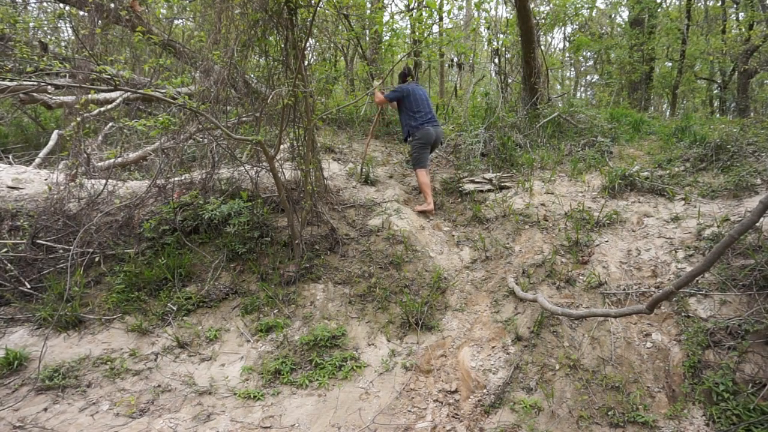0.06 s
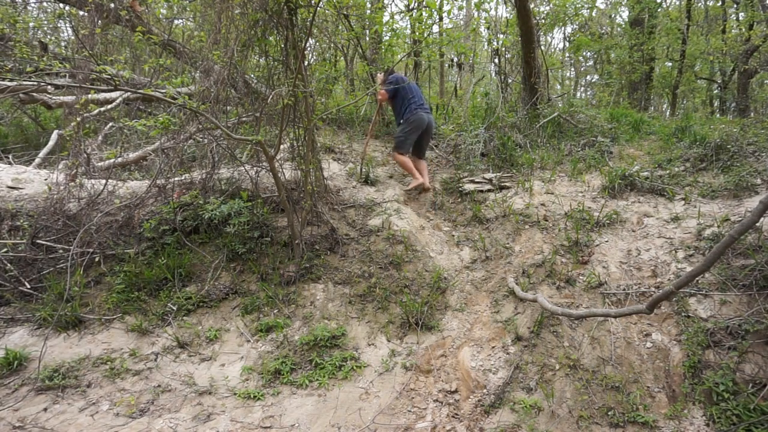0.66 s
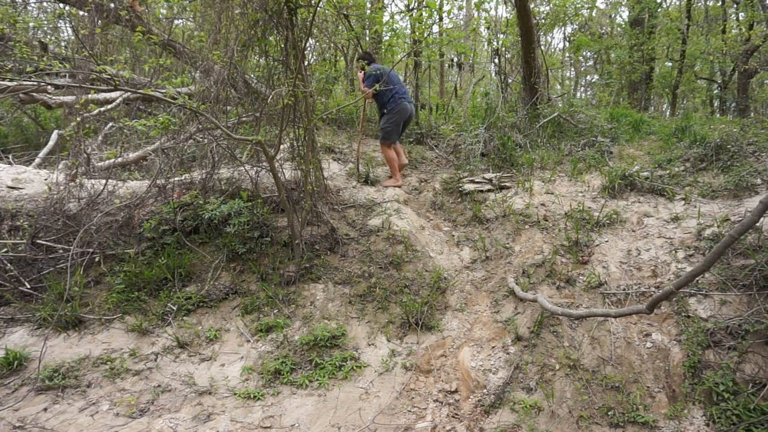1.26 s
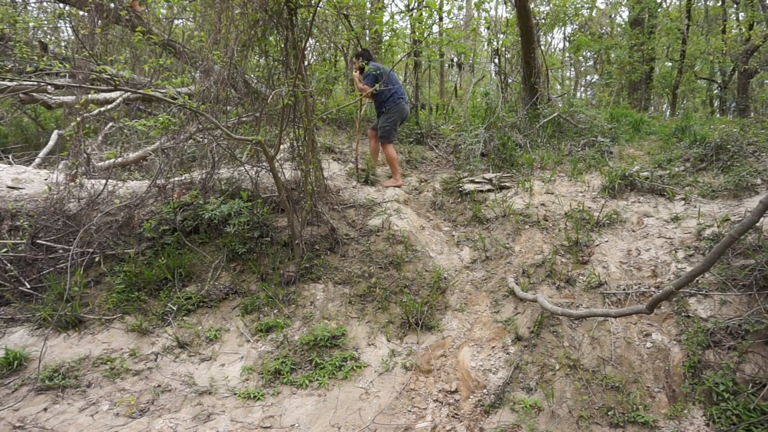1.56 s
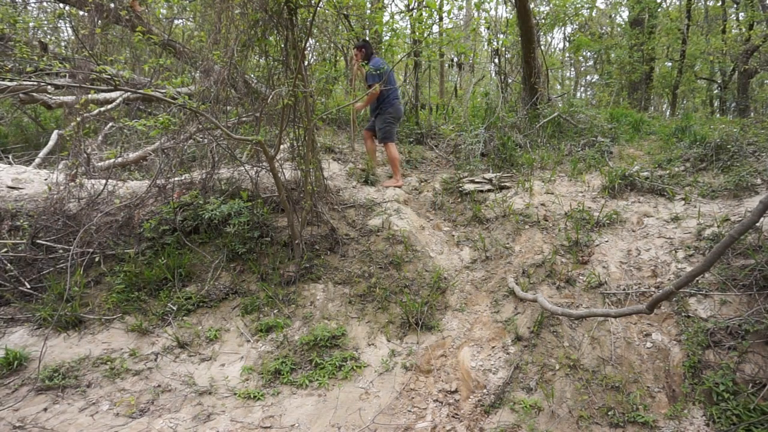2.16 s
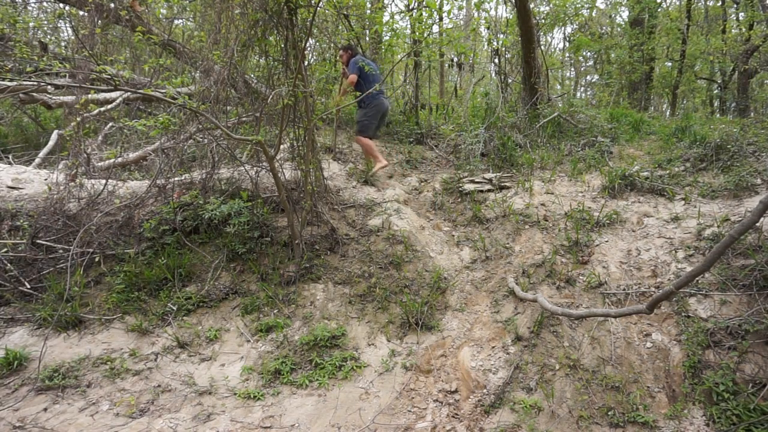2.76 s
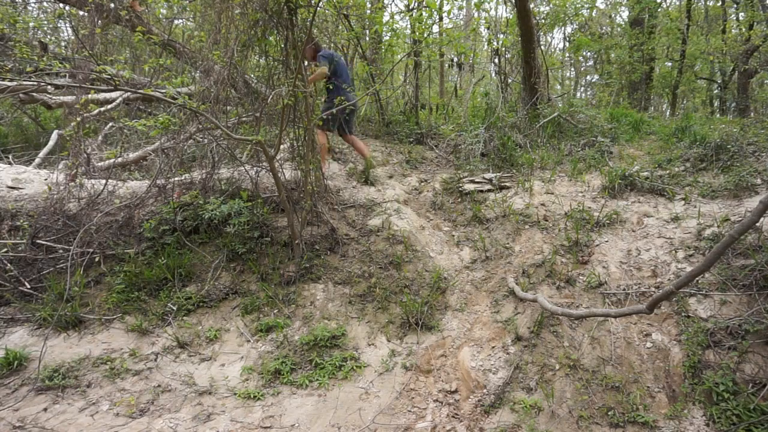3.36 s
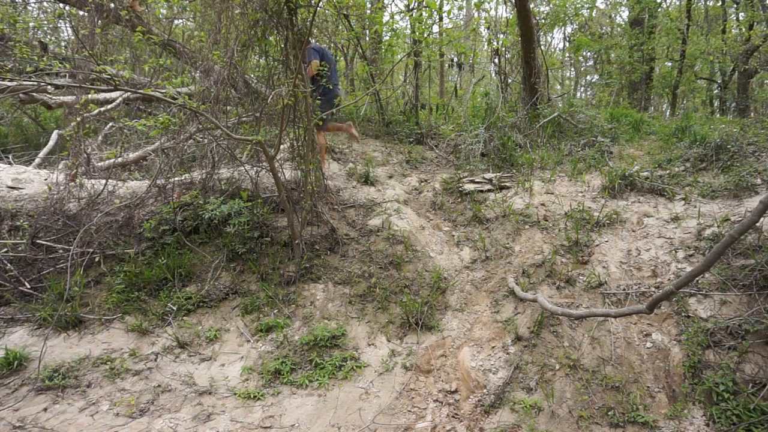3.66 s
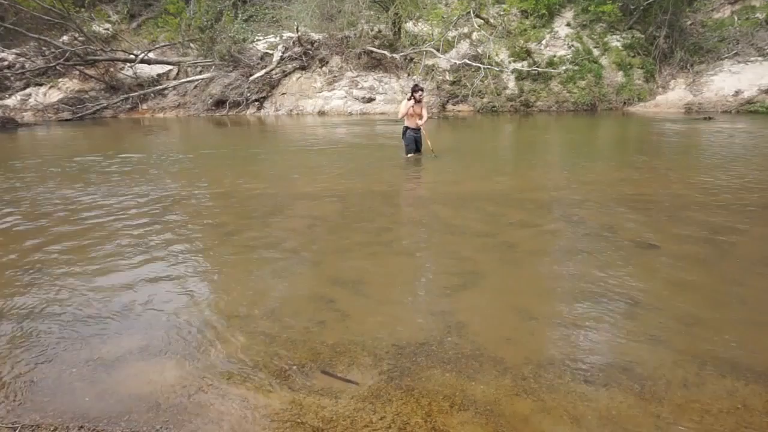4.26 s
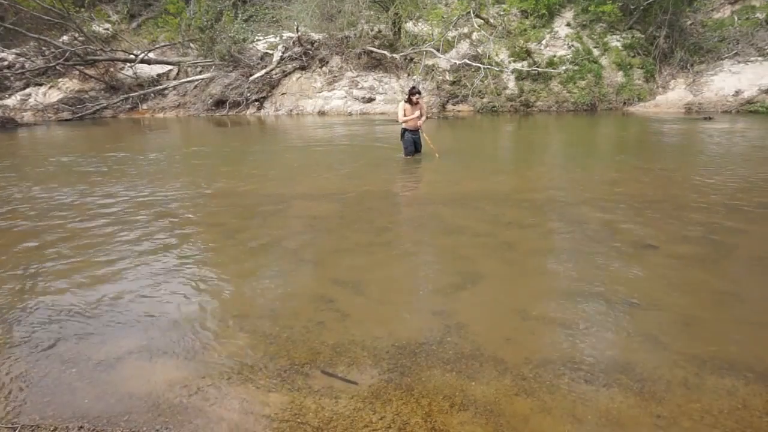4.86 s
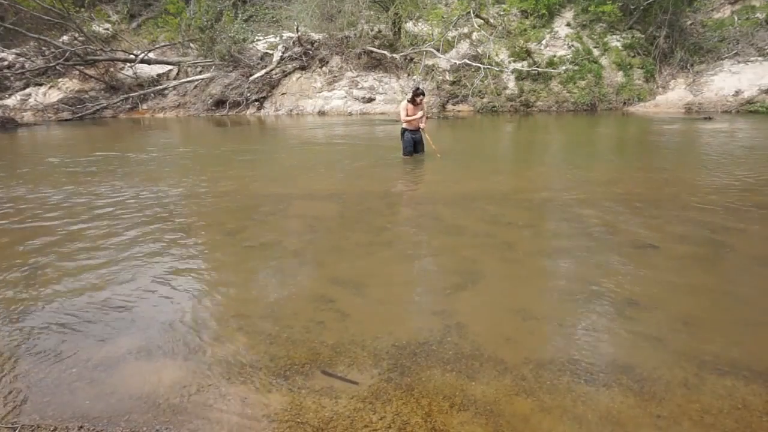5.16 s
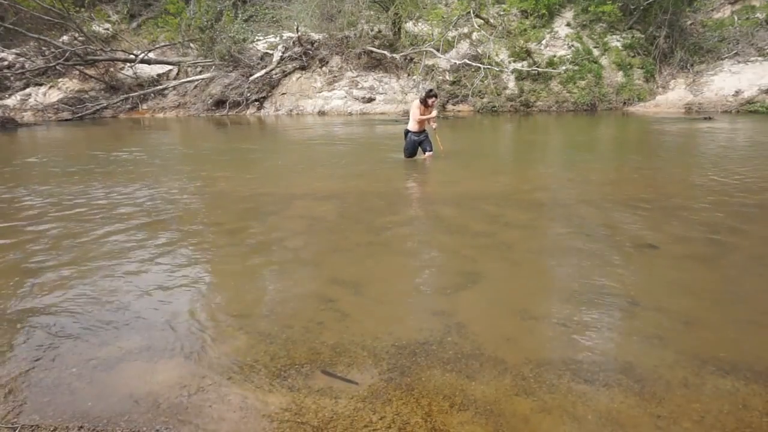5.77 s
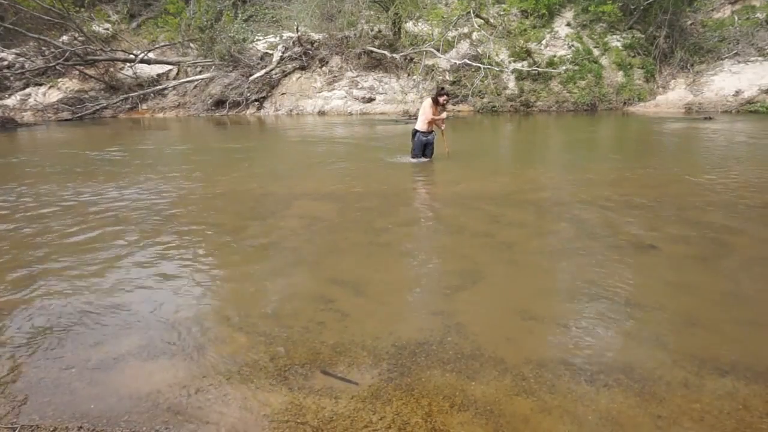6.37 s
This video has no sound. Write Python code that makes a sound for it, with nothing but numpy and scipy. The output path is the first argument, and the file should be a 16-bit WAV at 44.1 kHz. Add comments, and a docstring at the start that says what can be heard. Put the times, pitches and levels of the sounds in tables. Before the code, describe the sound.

A quiet wood begins with a low rumble of distant traffic, a soft hiss of air, a very faint machine whine and a thin cricket trill on the left. Leaves crackle lightly underfoot from about 1.1 seconds, and a twig snaps sharply at 1.5. A distant bird sings falling slurs that echo among the trees, clearest from 2.5 seconds, ending in two chips. The whole wood fades steadily, reaching silence at about 4.3 seconds.

A river then fades in with a low, even rush. One bird on the left repeats a rising whistle and quick twitter; another on the right gives short falling chirps, then a fast seesaw call near 6 seconds. Close to the microphone, a person wades, softly at 4.7 seconds, then with stronger strides at 5.7 and 6.1. The water sloshes, bubbles, gulps and sprays, loudest just before the end at 6.4 seconds.

```python
"""Wood, then wading a river

In a wood, far traffic rumbles, a cricket trills with its wings, twigs snap underfoot and a distant
bird sings falling slurs. The wood fades out and the river fades in: over the current, a person wades
near the microphone, legs churning up bubbles, spray and gulping pockets of air, while birds whistle
from both banks and the trunks scatter their notes."""
import sys
import numpy as np
from scipy import signal
from scipy.fft import rfft, irfft, next_fast_len
from scipy.io import wavfile
from scipy.ndimage import map_coordinates

SR = 44100
rng = np.random.default_rng(int(sys.argv[2]) if len(sys.argv) > 2 else 0)


def persist_wave(psi):
    """Save psi, clipped to +-1, as 16-bit WAV."""
    counts = np.round(np.clip(psi, -1, 1) * 32767).astype(np.int16)
    wavfile.write(sys.argv[1], SR, np.atleast_2d(counts).T)


N = 282240
TIME = np.arange(N) / SR
RIVER_START_S, RIVER_FADE_S = 4.275, 2.125


def amp(db):
    """Decibels to gain."""
    return 10 ** (np.asarray(db) / 20)


def unit(x):
    """Scaled to rms 1."""
    return x / np.sqrt(np.mean(x ** 2) + 1e-20)


def along(points, hz):
    """Rows of (f/Hz, value) read on a log frequency axis."""
    f, values = np.transpose(points)
    return np.interp(np.log(hz + 1), np.log(f + 1), values)


def sine(hz):
    """A tone that follows a pitch given for each sample."""
    return np.sin(2 * np.pi * np.cumsum(hz) / SR)


def bell(x, centre, width):
    """A Gaussian swell of height 1."""
    return np.exp(-.5 * ((x - centre) / width) ** 2)


def wobble(rate):
    """A smooth random curve, rate knots a second."""
    steps = np.arange(0, N * rate / SR + 1, 1 / 8)
    coarse = map_coordinates(rng.standard_normal(int(N * rate / SR) + 4), [steps])
    return np.interp(TIME * rate, steps, coarse)


def filtered(x, response):
    """x shaped by a gain that depends on frequency."""
    size = next_fast_len(N + SR // 2)
    return irfft(rfft(x, size) * response(np.fft.rfftfreq(size, 1 / SR)), size)[..., :N]


def add(track, s, sound):
    """Mix a sound into a track at time s."""
    part = track[..., max(round(s * SR), 0):][..., :sound.shape[-1]]
    part += sound[..., :part.shape[-1]]


def pan(left_db):
    """Left and right gains, the left louder by left_db, at constant total power."""
    return unit(amp([[left_db / 2], [-left_db / 2]]))


def spread(pair, spectrum, likeness):
    """Two unrelated signals become one coloured mid-side stereo sound of rms 1."""
    def mid_side_gains(hz):
        angle = np.arccos(np.clip(along(likeness, hz), -1, 1)) / 2
        return amp(along(spectrum, hz)) * [np.cos(angle), np.sin(angle)]
    mid, side = filtered(pair, mid_side_gains)
    return unit(np.array([mid + side, mid - side]))


# Open air at the microphone: f/Hz, left-right likeness
OUTDOOR_LIKENESS = [(100, 1), (300, 0.92), (700, 0.085), (1500, 0.033), (4000, 0.033), (12000, 0.026)]
def rush(spectrum):
    """Diffuse outdoor noise from all round the microphone."""
    return spread(rng.standard_normal((2, N)), spectrum, OUTDOOR_LIKENESS)


# Echo of the surrounding trees: f/Hz, time to fall 60 dB/s
TREE_DECAY = [(300, 0.25), (2000, 1), (4000, 1), (10000, 0.066)]
def among_trees(x, left_db, wet_db):
    """The direct sound from one side, then echoes scattered by the trunks, mostly from that side too."""
    hz, t, noise = signal.stft(rng.standard_normal((2, SR * 3 // 4)), SR, nperseg=256)
    near_trunks = 1 + 0.22 * np.exp(-t / 0.023)
    decay = amp(-60 * t / along(TREE_DECAY, hz)[:, None])
    tail = signal.istft(noise * near_trunks * decay, SR, nperseg=256)[1]
    echo = signal.fftconvolve(x[None], tail / np.linalg.norm(tail[0]), axes=1)[:, :N]
    return pan(left_db) * x + amp(wet_db) * pan(0.56 * left_db) * echo


# The far road as it sounds from the wood: f/Hz, level/dB
RUMBLE_SPECTRUM = [(20, -14), (35, -16.5), (58, -1.5), (80, -2), (125, 1), (190, -5.5), (260, -10),
                   (400, -25.5), (800, -55)]
ENGINE_SPECTRUM = [(120, -49), (190, -1.5), (235, 0.5), (285, 5), (335, -1), (400, -10), (600, -54)]
TYRE_SPECTRUM = [(200, -35), (400, -1), (650, -0.5), (1000, -5), (1400, -10.5), (2000, -42.5), (4000, -35),
                 (9000, -39)]
# Louder vehicles going by: t/s, engine level/dB, tyre level/dB
PASSES = [(.13, -58.5, -58.5), (.87, -45.5, -64), (2.27, -41.5, -60.5), (3.15, -44, -60)]
def traffic(approach_s=0.14, recede_s=0.24):
    """A far road, a little left: steady rumble, with engines and tyres swelling at each vehicle."""
    engines, tyres = amp(-56.5), amp(-55.3)
    for s, engine_db, tyre_db in PASSES:
        nearness = 1 / (1 + ((TIME - s) / np.where(TIME < s, approach_s, recede_s)) ** 2)
        engines = np.hypot(engines, amp(engine_db) * nearness)
        tyres = np.hypot(tyres, amp(tyre_db) * nearness)
    rumble = amp(-45.5) * rush(RUMBLE_SPECTRUM)
    return rumble + engines * pan(1.9) * rush(ENGINE_SPECTRUM) + tyres * pan(4.3) * rush(TYRE_SPECTRUM)


def machine_whine(pitch_hz=627.7, fall_db_per_s=2):
    """A far machine, a little left: one faint, wavering tone that slowly weakens."""
    hz = pitch_hz + 7 * wobble(25)
    db = -58.5 - fall_db_per_s * TIME + 3 * wobble(14)
    return pan(4.3) * amp(db) * sine(hz)


# Background air in the wood: f/Hz, level/dB
AIR_SPECTRUM = [(300, -27), (1200, 8), (2000, 4), (2700, 2), (3400, -1.5), (4500, -2), (7000, -4),
                (12000, -6.5), (16000, -10.5)]
def wood_air():
    """A soft, even hiss all round the microphone."""
    return amp(-59.5) * pan(0.8) * rush(AIR_SPECTRUM)


# Rasp from the uneven teeth of the wing's file: f/Hz, level/dB
RASP_SPECTRUM = [(4800, -33), (5300, -19.5), (5650, -4.5), (6000, -3.5), (6250, -15), (6600, -41)]
def cricket(strokes_per_s=44.13, pitch_hz=5840, sag_hz=550):
    """Off to the left, each wing stroke is a short, raspy, sagging tone; the undergrowth smears it."""
    stroke = (strokes_per_s * TIME + .68 + .03 * wobble(3)) % 1
    hz = pitch_hz - sag_hz * (stroke - .5) + 40 * wobble(200)
    wing = bell(stroke, .5, 0.17) * amp(0.3 * wobble(29.93))
    trill = unit(wing * sine(hz))
    rasp = unit((wing + 0.17) * rush(RASP_SPECTRUM))
    return amp(-59) * among_trees(trill, left_db=16, wet_db=-3.5) + amp(-62) * pan(4.2) * rasp


# Twigs breaking on the wood's floor: t/s, level/dB
TWIG_SNAPS = [(1.309, -50), (1.478, -27), (1.579, -56), (1.606, -63)]
# Feet scuffing the leaves: t/s, level/dB, width/s
LEAF_SCUFFS = [(1.116, -64.5, .04), (1.489, -62, .012), (1.565, -66.5, 0.11), (2.817, -60, 0.022)]
# Colour of dry twigs and leaves: f/Hz, level/dB
LITTER_SPECTRUM = [(1200, -30), (2800, -12), (3900, 2), (5000, -2), (9500, -1), (16000, -2)]
def underfoot(snap_rise_s=0.00016, snap_t60_s=0.006):
    """Near the centre, twigs crack dryly and leaf litter crackles under bare feet."""
    track, age = np.zeros(N), TIME[:SR // 50]
    crack = (1 - np.exp(-age / snap_rise_s)) * amp(-60 * age / snap_t60_s)
    for s, db in TWIG_SNAPS:
        add(track, s, amp(db) * crack * rng.standard_normal(len(age)))
    crackle = unit(rng.standard_normal(N) * amp(3.9 * wobble(500)))
    track += crackle * sum(amp(db) * bell(TIME, s, width) for s, db, width in LEAF_SCUFFS)
    steps = filtered(track, lambda hz: amp(along(LITTER_SPECTRUM, hz)))
    return among_trees(steps, left_db=2, wet_db=-5)


def song(note, starts, waver=0.0041, flutter_db=1.0, waver_rate=120):
    """A bird's whistled note, repeated with slight changes of pitch and strength."""
    times, pitches, levels = np.transpose(note)
    age = TIME[:int(times[-1] * SR)]
    hz, db = np.interp(age, times, pitches), np.interp(age, times, levels)
    drift = 1 + waver * wobble(waver_rate)
    flutter = unit(amp(flutter_db * wobble(70)))
    track = np.zeros(N)
    for s, level_db in starts:
        detune = np.take(drift, int(s * SR) + np.arange(len(age)), mode="wrap")
        add(track, s, np.sqrt(2) * amp(db + level_db) * sine(hz * detune))
    return track * flutter


# Notes of the bird far off in the wood: t/s into the note, f/Hz, level/dB
SLOW_SLUR_NOTE = [(0, 4300, -14), (.035, 3850, -2), (.065, 3650, 2), (.1, 3420, -7), (.16, 3150, -1),
                  (.21, 2820, .5), (.26, 2550, -1), (.28, 2620, -20)]
FAST_SLUR_NOTE = [(0, 5300, -14), (.025, 4550, -7), (.045, 4050, -9), (.062, 3680, -4), (.08, 3350, -7.5),
                  (.145, 2150, -5), (.175, 2030, -10), (.23, 2300, -21)]
CHIP_NOTE = [(0, 4600, -12), (.018, 3900, 0), (.04, 3100, -2), (.05, 2900, -20)]
# When each is sung: t/s, level/dB
SLOW_SLUR_STARTS = [(1.24, -67), (1.884, -63.5)]
FAST_SLUR_STARTS = [(2.455, -54.5), (2.809, -50.5), (3.144, -51), (3.47, -51.5)]
CHIP_STARTS = [(3.79, -55), (4.084, -57)]
def wood_bird():
    """Far slurs that quicken and end in two chips; the foliage breaks them up and scatters them."""
    parts = [(SLOW_SLUR_NOTE, SLOW_SLUR_STARTS), (FAST_SLUR_NOTE, FAST_SLUR_STARTS),
             (CHIP_NOTE, CHIP_STARTS)]
    notes = sum(song(note, starts, waver=.022, flutter_db=3, waver_rate=450) for note, starts in parts)
    return amp(-2.5) * among_trees(notes, left_db=2, wet_db=2)


# Flowing water, from the riverside: f/Hz, level/dB
CURRENT_SPECTRUM = [(20, -18), (45, -6.5), (70, -2.5), (105, 0.5), (160, -5), (240, -12.5), (400, -23.5),
                    (1000, -20.5), (3000, -22.5), (5200, -31), (7000, -35), (12000, -46)]
def current():
    """The river runs by with a low, steady rush."""
    return amp(-51) * rush(CURRENT_SPECTRUM)


def in_time(start_s, period_s, db, count):
    """Evenly repeated notes as rows of t/s, level/dB."""
    return [(start_s + k * period_s, db) for k in range(count)]


def later(starts, delay_s, gain_db):
    """The same rhythm a little later, at another level."""
    return [(s + delay_s, db + gain_db) for s, db in starts]


# Notes from the left bank: t/s into the note, f/Hz, level/dB
WHISTLE_NOTE = [(0, 1610, -13), (.03, 1690, -3), (.065, 1775, -2), (.09, 1900, -6), (.115, 2005, -5),
                (.15, 1985, -6.5), (.165, 1950, -25)]
TWITTER_NOTE = [(0, 4045, -47), (.008, 3730, 1), (.022, 3400, -9), (.03, 3310, -4.5)]
def left_bank_bird():
    """A rolling phrase in strict time: a rising whistle, then a fading triple twitter."""
    phrases = in_time(start_s=4.245, period_s=.3383, db=-49, count=7)
    whistle = song(WHISTLE_NOTE, phrases, waver=0.0046)
    twitter = sum(song(TWITTER_NOTE, later(phrases, delay_s=.192 + k * .027, gain_db=-2 - 1.8 * k))
                  for k in range(3))
    return among_trees(whistle, left_db=14, wet_db=-2.5) + among_trees(twitter, left_db=10, wet_db=0)


# Notes from the right bank: t/s into the note, f/Hz, level/dB
FLICK_NOTE = [(0, 3900, -15), (.016, 3450, -8), (.028, 3120, 0), (.04, 2880, -7), (.046, 2800, -22)]
SEESAW_UP_NOTE = [(0, 2610, -27), (.012, 2700, 1), (.022, 3080, -1.5), (.03, 3250, -13), (.035, 3270, -31)]
SEESAW_DOWN_NOTE = [(0, 4910, -7), (.006, 4180, 1.5), (.013, 3540, 3), (.02, 3300, -3), (.024, 3200, -23)]
# When each flick is sung: t/s, level/dB
FLICK_STARTS = [(4.359, -46), (4.678, -49), (5.0, -48), (5.326, -48), (5.677, -51.5)]
def right_bank_birds():
    """Short falling flicks, then a quick seesaw call."""
    flicks = song(FLICK_NOTE, FLICK_STARTS, waver=0.0152, flutter_db=0.5)
    ups = in_time(start_s=5.954, period_s=.1022, db=-43.5, count=5)
    downs = later(ups, delay_s=.06, gain_db=-6.5)
    seesaw = song(SEESAW_UP_NOTE, ups, waver=0.0076)
    seesaw += song(SEESAW_DOWN_NOTE, downs, waver=.04, waver_rate=600)
    return among_trees(flicks, left_db=-15, wet_db=-5) + among_trees(seesaw, left_db=-15, wet_db=-8)


def bubbles(count, low_hz, high_hz, cycles, rise, scatter_db):
    """Two clouds of damped bubble tones, each tone rising in pitch as its bubble nears the surface."""
    when, pitch, life, side, size = rng.random((5, count, 1))
    hz = low_hz * (high_hz / low_hz) ** pitch
    k = np.arange(SR // 30)
    age = k / SR * hz / (cycles * (.5 + life))  # in lifetimes of each bubble
    ring = np.exp(-np.pi * age) * (1 - np.exp(-10 * age)) * (1 - k / len(k))
    glide = 1 + rise * np.minimum(age, 2) / 2
    strength = amp(scatter_db * size) * np.sqrt(hz / low_hz)
    tones = strength * ring * np.sin(2 * np.pi * hz * k / SR * glide)
    clouds = np.zeros((2, N))
    for s, second_cloud, tone in zip(RIVER_START_S + when.ravel() * RIVER_FADE_S, side.ravel() > .5, tones):
        add(clouds[int(second_cloud)], s, tone)
    return clouds / clouds[:, round(RIVER_START_S * SR):].std()


# A leg pushes through the river: t/s, length/s, level/dB
LEG_PUSHES = [(4.67, 0.044, -50), (5.28, 0.23, -57), (5.678, 0.3, -43.5), (6.07, 0.29, -44.5)]
def stirring(rise_s=0.044, settle_s=0.13, flight_s=0.033, chop_db=1.2):
    """Strength of slosh and spray: each stride piles water up to settle again; the drops land later."""
    slosh = lapping = amp(-56)  # water at the legs between strides
    for s, length, db in LEG_PUSHES:
        pile_up = 1 - np.exp(-np.maximum(TIME - s, 0) / rise_s)
        settle = np.exp(-np.maximum(TIME - s - length, 0) / settle_s)
        slosh = np.hypot(slosh, amp(db) * pile_up * settle)
    delayed_slosh = np.interp(TIME - flight_s, TIME, slosh)
    spray = amp(-69.5) * (delayed_slosh / lapping) ** 0.62
    return slosh * amp(chop_db * wobble(35)), spray * amp(chop_db * wobble(70))


# Water slapping back: t/s, slosh level/dB, spray level/dB, width/s
SLAPS = [(5.318, -55, -65, 0.0066), (5.355, -51, -71, 0.0067), (5.82, -49, -74, 0.0099),
         (5.918, -43, -66, 0.013), (6.014, -51, -59, 0.0046), (6.09, -44, -56.5, 0.021),
         (6.169, -42.5, -64, 0.011), (6.282, -38.5, -51.5, 0.013), (6.383, -48, -57, 0.0046)]
# Churned water and flying drops: f/Hz, level/dB
SLOSH_SPECTRUM = [(120, -16), (250, -5), (420, -8), (650, -2.5), (900, -5), (1300, -8.5), (2200, -7),
                  (3500, -10), (5000, -24.5), (9000, -33)]
SPRAY_SPECTRUM = [(1500, -11.5), (3500, -5), (5500, 1.5), (7500, -5), (10000, -7.5), (14000, -12),
                  (16000, -25.5)]
# The water at the microphone: f/Hz, left-right likeness
WATER_LIKENESS = [(100, 0.39), (640, 0.98), (1400, 0.5), (3000, 0.26), (7000, 0.59)]
def wading():
    """Close by, a little right, legs churn up bubbles and spray; both surge when water slaps back."""
    slosh, spray = stirring()
    for s, slosh_db, spray_db, width in SLAPS:
        surge = bell(TIME, s, width)
        slosh = np.hypot(slosh, amp(slosh_db) * surge)
        spray = np.hypot(spray, amp(spray_db) * surge)
    churn = bubbles(count=2600, low_hz=280, high_hz=3400, cycles=24, rise=.12, scatter_db=11)
    drops = bubbles(count=2400, low_hz=3000, high_hz=13000, cycles=10, rise=.1, scatter_db=12)
    # single bubbles stand out of a wash of countless fainter ones
    churn += rng.standard_normal((2, N))
    drops += 1.9 * rng.standard_normal((2, N))
    wash = spread(rng.standard_normal((2, N)), SLOSH_SPECTRUM, WATER_LIKENESS)
    gurgle = spread(churn * (TIME > RIVER_START_S), SLOSH_SPECTRUM, WATER_LIKENESS)
    patter = spread(drops * (TIME > RIVER_START_S), SPRAY_SPECTRUM, WATER_LIKENESS)
    return amp(-7) * slosh * pan(-4) * (wash + gurgle) + amp(-2) * spray * pan(-1.7) * patter


# Big air pockets closing near the microphone: t/s, starting f/Hz, length/s, level/dB
AIR_POCKETS = [(4.703, 580, 0.06, -46), (4.79, 485, .043, -47), (5.616, 630, .03, -44),
               (5.684, 577, 0.035, -44.5), (5.737, 472, 0.031, -43), (5.84, 595, .023, -34.5),
               (5.891, 612, 0.085, -41), (5.991, 680, 0.022, -33), (6.111, 582, 0.03, -34.5),
               (6.118, 193, 0.072, -38.5), (6.163, 249.5, .074, -38.5), (6.198, 469, 0.048, -43),
               (6.273, 516, 0.067, -35), (6.378, 727, 0.023, -39.5)]
def gulps(rise_per_s=3.4):
    """Pockets of air behind the legs ring and rise in pitch as they close."""
    track = np.zeros(N)
    for s, start_hz, length, db in AIR_POCKETS:
        progress = np.linspace(0, 1, int(length * SR))
        hz = start_hz * (1 + rise_per_s * length * progress)
        ring = (1 - np.exp(-7 * progress)) * (1 - progress) ** 2
        add(track, s, amp(db + 2.5) * ring * sine(hz))
    return among_trees(track, left_db=0.5, wet_db=-15)


# A very distant bird's note: t/s into the note, f/Hz, level/dB
FAR_NOTE = [(0, 5000, -13), (.03, 4740, -10), (.07, 4600, -8), (.09, 4560, -24)]
def far_bird():
    """Thin, high notes from deep in the trees on the right, more echo than direct sound."""
    starts = in_time(start_s=4.92, period_s=.15, db=-67.5, count=5)
    return among_trees(song(FAR_NOTE, starts, waver=0.0168), left_db=-14, wet_db=9.5)


def scene():
    """The wood fades evenly to silence, then the river fades in."""
    wood = traffic() + machine_whine() + wood_air() + cricket() + underfoot() + wood_bird()
    river = current() + left_bank_bird() + right_bank_birds() + wading() + gulps() + far_bird()
    fade_out = np.maximum(1 - TIME / RIVER_START_S, 0)
    fade_in = np.maximum((TIME - RIVER_START_S) / RIVER_FADE_S, 0)
    return wood * fade_out + river * fade_in


def record(dry):
    """The camera's microphone channels keep nothing above their band limit."""
    return filtered(dry, lambda hz: hz < 15750)


dry = scene()
out = record(dry)
persist_wave(out)
```